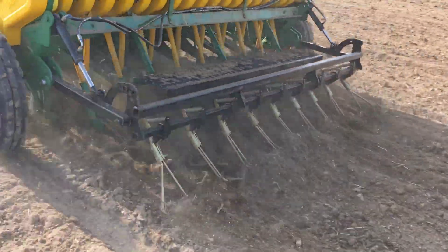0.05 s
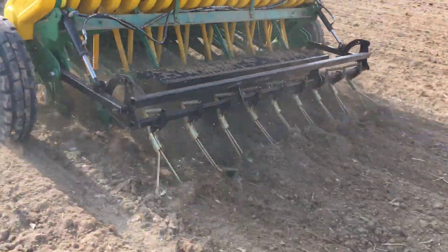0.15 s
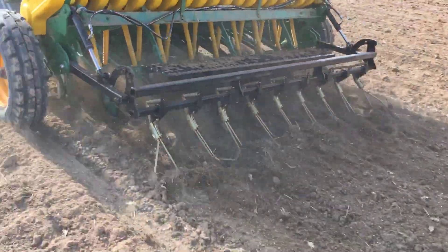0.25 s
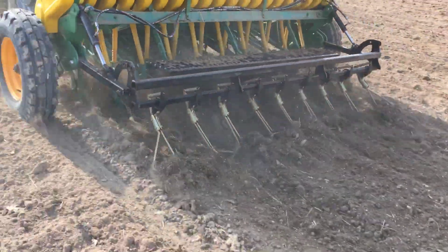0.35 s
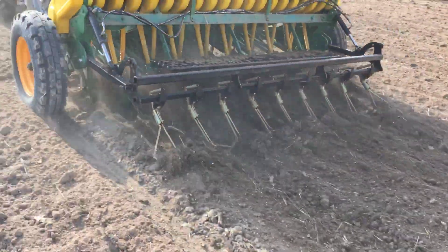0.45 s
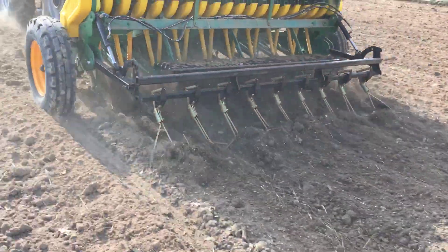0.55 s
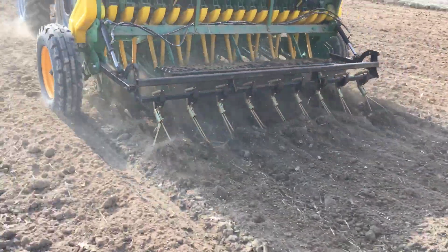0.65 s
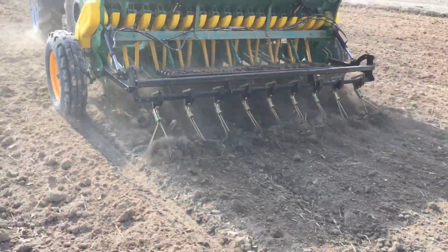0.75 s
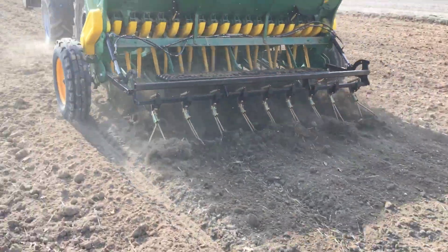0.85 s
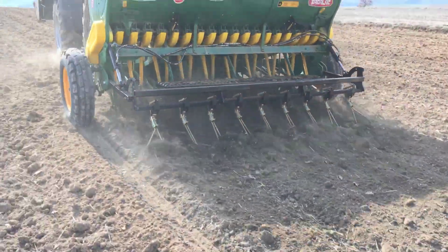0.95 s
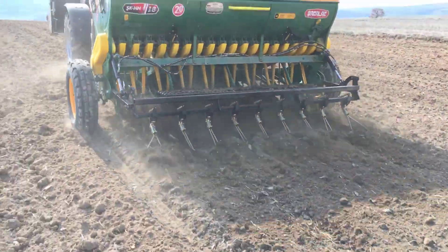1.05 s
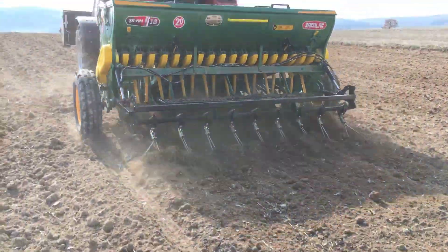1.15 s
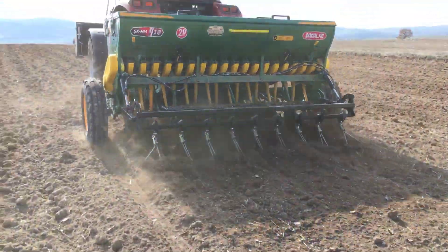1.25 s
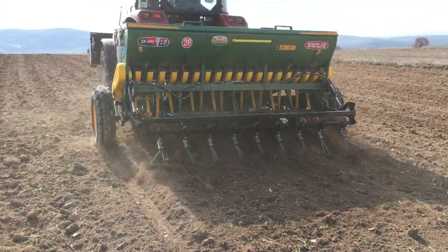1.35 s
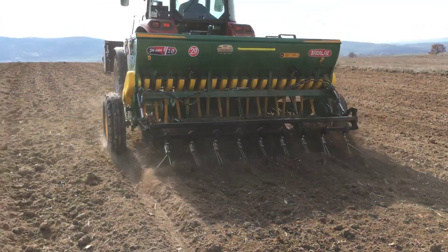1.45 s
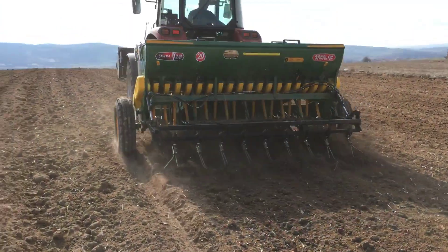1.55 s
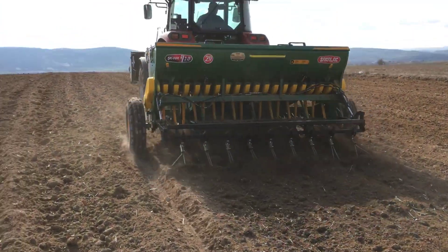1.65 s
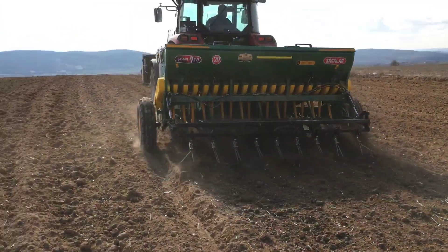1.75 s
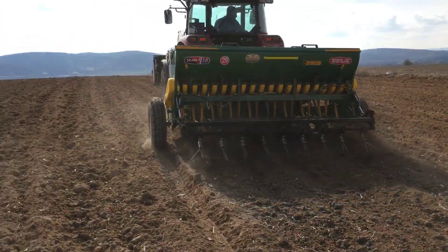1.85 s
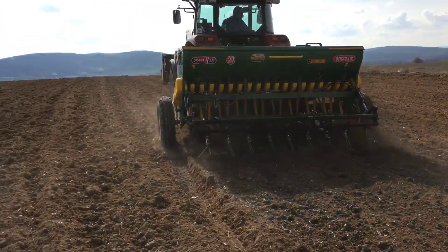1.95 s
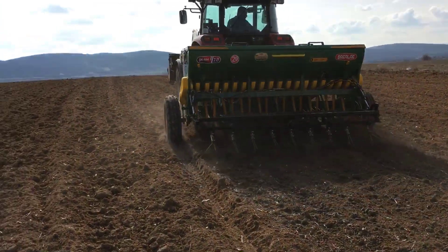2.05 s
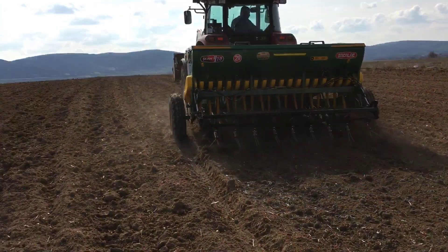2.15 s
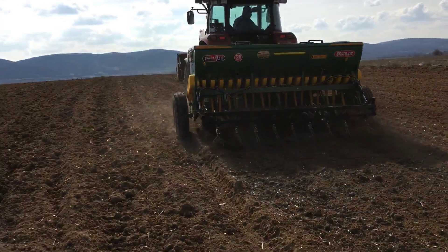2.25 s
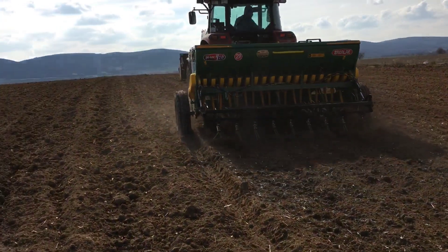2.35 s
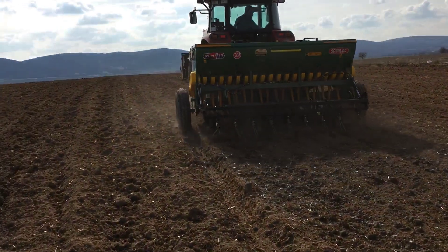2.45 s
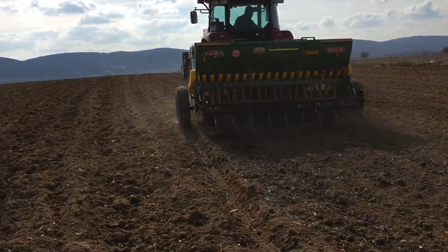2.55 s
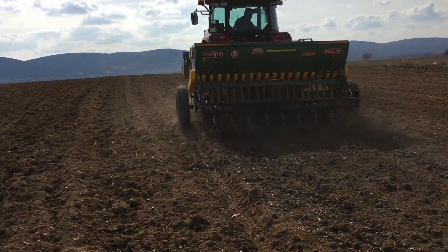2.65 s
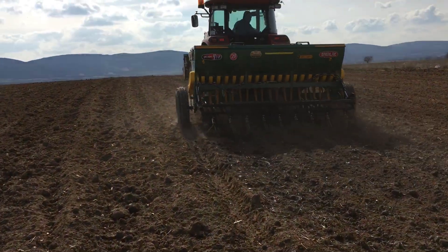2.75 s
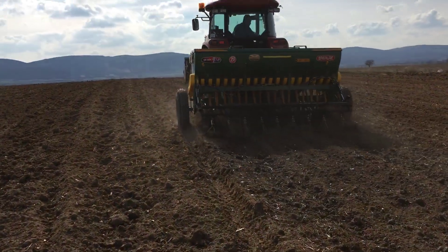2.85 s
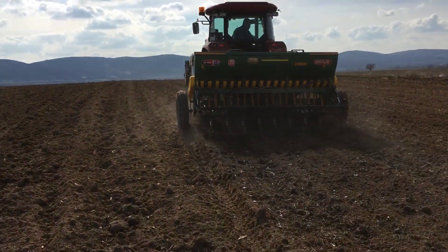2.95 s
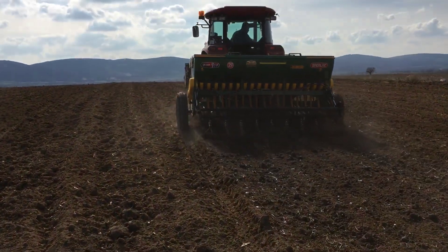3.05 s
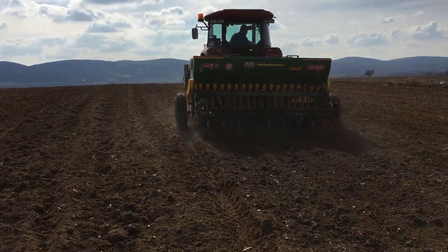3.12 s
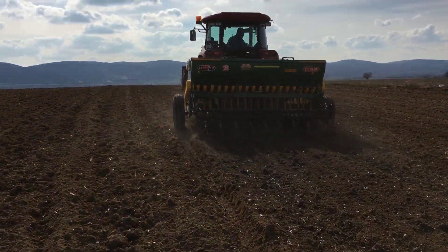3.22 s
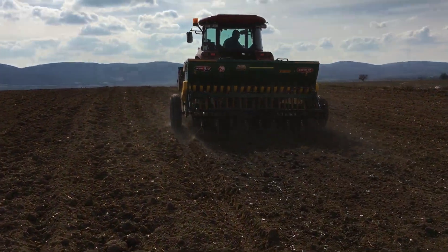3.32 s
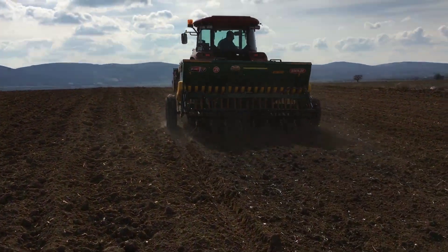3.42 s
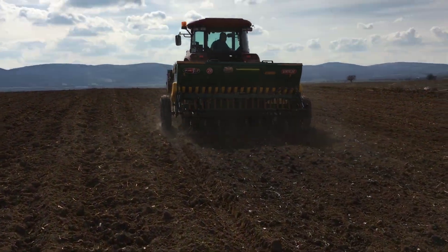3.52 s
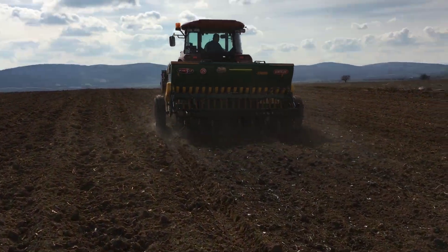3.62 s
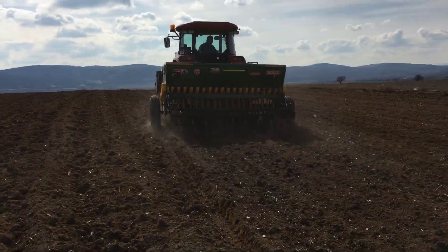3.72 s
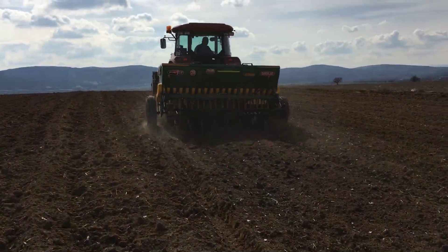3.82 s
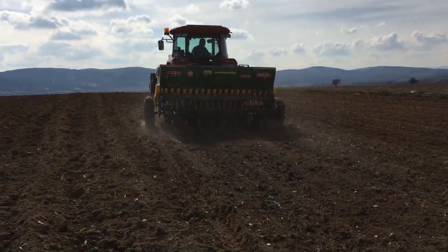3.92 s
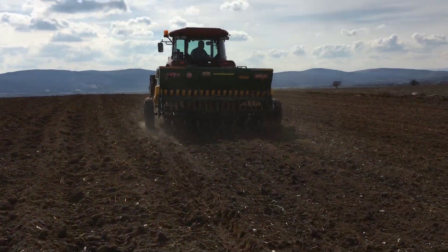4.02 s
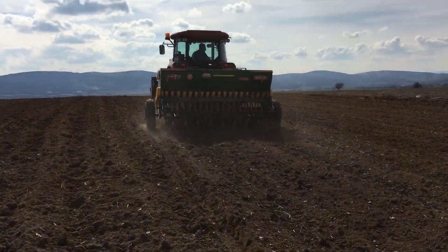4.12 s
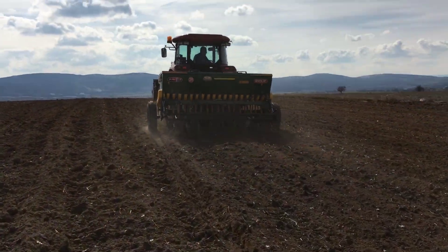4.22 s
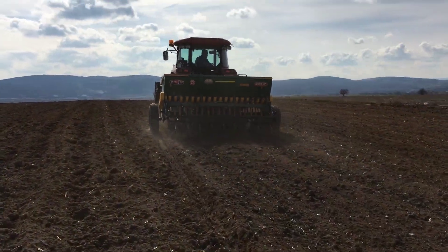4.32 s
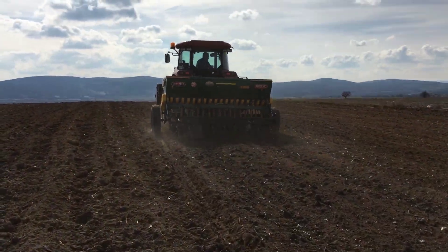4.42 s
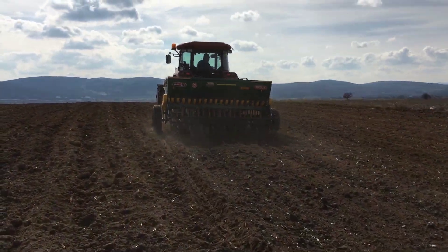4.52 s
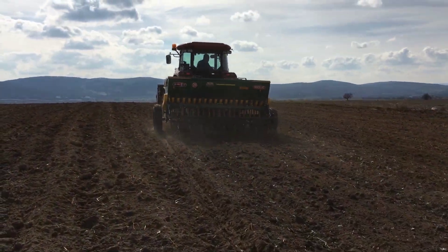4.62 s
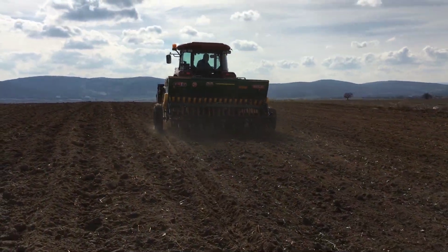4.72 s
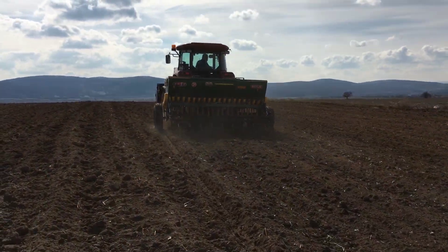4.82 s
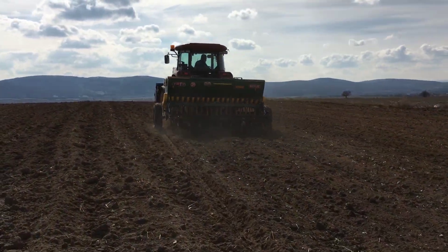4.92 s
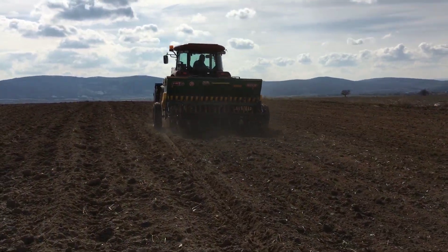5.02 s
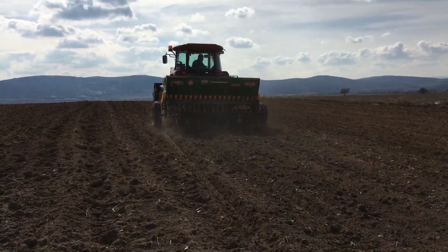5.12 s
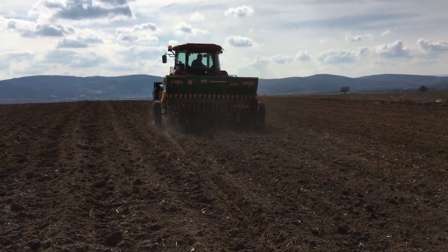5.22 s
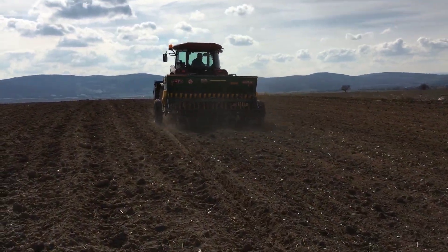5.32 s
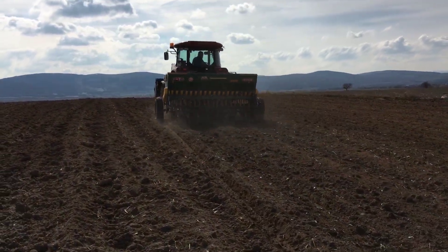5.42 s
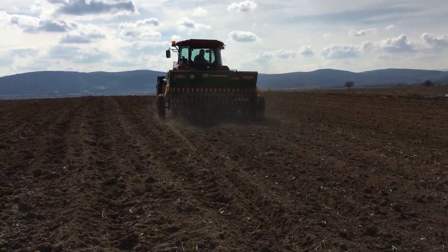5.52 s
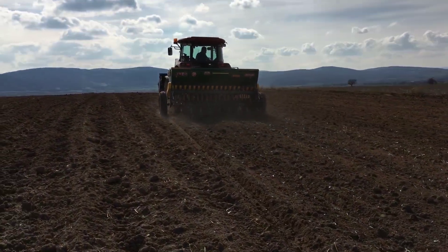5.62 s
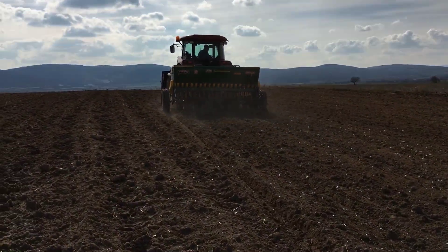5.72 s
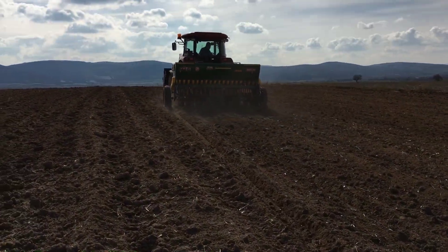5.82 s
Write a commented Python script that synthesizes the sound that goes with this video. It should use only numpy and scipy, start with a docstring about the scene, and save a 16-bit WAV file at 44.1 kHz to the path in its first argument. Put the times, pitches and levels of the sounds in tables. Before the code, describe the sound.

A tractor engine works at steady throttle, close and harsh at first, with rough metallic chatter and whining gears over a low throbbing exhaust. Moving away, it becomes a quieter, duller drone. Faint dry soil hiss from the drill tines fades too, with a tiny stone click. Gusts rumble and pop against the unshielded mono microphone; there is no room echo.

```python
"""A four-cylinder diesel tractor tows a seed drill away across a dry field at steady throttle.
Its exhaust is a stack of low tones; looped and chance knocks, filtered, make the clatter and injector rattle.
Gears whine as blurred tones locked to the crankshaft. Filtered noise and grains are soil hissing past the
tines, with clicks of stones; faint brief tones, mostly high, come and go. Wind noise gusts and sudden pops
strike the microphone, over a faint steady hiss."""
import sys
import numpy as np
from scipy import signal
from scipy.fft import rfft, irfft, next_fast_len
from scipy.io import wavfile
from scipy.ndimage import uniform_filter1d

SR = 44100
rng = np.random.default_rng(int(sys.argv[2]) if len(sys.argv) > 2 else 0)


def to_wav(s):
    """Save 16-bit WAV."""
    ch = np.atleast_2d(s).T  # columns
    pcm = np.round(np.clip(ch, -1, 1) * 32767)  # PCM
    wavfile.write(sys.argv[1], SR, pcm.astype(np.int16))


N = 258867

# Spectra: pitch_hz, level_db (relative density; the coloured sound is scaled to rms 1)
# microphone's own hiss
HISS_SPECTRUM = [(100, -1), (4000, -2), (9500, -1.5), (11000, -4.5), (15500, -8)]
# deep wind rumble, and the flutter above it
RUMBLE_SPECTRUM = [(5, -71.5), (15, -44), (27, -15), (38, 2), (50, 11), (70, 4.5), (100, -1), (140, -5.5),
                   (200, -14.5), (400, -58), (2000, -110)]
FLUTTER_SPECTRUM = [(20, -45.5), (70, -31.5), (130, -2), (200, 2.5), (300, -1.5), (450, -6.5), (700, -20.5),
                    (1400, -19.5), (2800, -37), (6000, -87)]
# soil on the tines, and a stone clicking against one
SOIL_SPECTRUM = [(1000, -43.5), (3500, -10.5), (4900, -2.5), (5500, 2.5), (6100, 0.5), (6600, -1.5),
                 (7200, -7.5), (7550, -7.5), (7900, -9), (9600, -11), (10500, -29), (11500, -13.5),
                 (15500, -30)]
STONE_SPECTRUM = [(1200, -46), (2600, -2), (3100, 6), (3900, 0), (4500, -18), (7000, -47), (12000, -73)]
# injector rattle, and the engine block
INJECTOR_SPECTRUM = [(200, -50), (900, -2), (1400, -0.5), (1650, 3.5), (2020, -4), (2300, 2.5),
                     (2750, -2.5), (3200, -3), (3500, -11.5), (4000, -19), (4400, -22.5), (4800, -28.5),
                     (7000, -57), (14000, -68)]
BLOCK_SPECTRUM = [(120, -20), (200, -18.5), (400, -9), (490, -7), (570, -1), (620, 1), (690, 3),
                  (750, -0.5), (920, -0.5), (1020, -5), (1170, -17), (1300, -27.5), (1600, -26),
                  (1900, -44.5), (5000, -100)]

# breeze between the gusts: time_s, rumble_db, flutter_db (before the wind trims)
BREEZE = [(0, -36, -31.5), (1.3, -40, -37.5), (2.4, -39, -38.5), (3.6, -41.5, -42), (4.7, -44, -58.5),
          (5.2, -46.5, -59), (5.87, -42, -44)]
# gusts: height_s, length_s, rumble_db, flutter_db (before the wind trims)
GUSTS = [(-0.006, 0.08, -30.5, -23.5), (0.134, 0.12, -32, -32), (0.265, 0.074, -36, -32),
         (0.454, 0.026, -32, -34), (0.478, 0.064, -39, -45), (0.652, 0.05, -29, -31.5),
         (0.703, 0.019, -42, -25.5), (0.754, 0.02, -35, -30), (0.808, .05, -34, -31),
         (1.08, 0.049, -35, -31.5), (1.883, 0.03, -32.5, -42), (2.11, 0.25, -35, -37.5),
         (2.274, 0.041, -32.5, -34), (3.037, 0.019, -50, -35), (3.234, 0.03, -35, -35),
         (3.332, 0.087, -31.5, -32.5), (3.595, 0.1, -30.5, -35.5), (3.716, 0.043, -31.5, -61),
         (3.87, 0.1, -35, -39), (4.352, 0.065, -38, -40), (4.875, 0.055, -36.5, -47),
         (5.339, 0.043, -32.5, -34.5), (5.57, 0.21, -35.5, -39.5), (5.823, 0.099, -39, -38)]
# eddies bursting on the microphone: start_s, strength_db (before decay and filters), sharpness_hz
POPS = [(.024, -11.5, 77), (0.029, -18.5, 180), (.105, -15, 93), (0.123, -15.5, 116), (.226, -17, 75),
        (0.2668, -20, 93), (0.445, -17, 700), (.448, -22, 1100), (0.49, -15, 93), (.650, -21.5, 1350),
        (0.653, -20, 75), (0.6598, -11.5, 65), (.679, -24, 1400), (0.701, -23, 1020), (.71, -17, 1220),
        (0.715, -18.5, 180), (.759, -13.5, 750), (0.78, -18, 199), (.801, -14.5, 273), (1.080, -20.5, 1490),
        (1.082, -21, 346), (1.099, -21.5, 1290), (1.104, -26, 1500), (2.032, -16.5, 93), (2.136, -23, 404),
        (2.1505, -12.5, 116), (2.283, -18.5, 304), (2.29, -17, 98), (2.375, -16, 480), (3.025, -23.5, 450),
        (3.319, -19, 70), (3.329, -23, 500), (3.347, -15, 56), (3.595, -9.5, 54), (3.61, -17, 70),
        (3.724, -16.5, 54), (3.8043, -11.5, 444), (3.834, -20.5, 260), (3.864, -24, 109), (3.881, -19, 100),
        (5.33, -24.5, 380), (5.338, -18, 60), (5.52, -20, 130)]

# patches of clods under the tines: start_s, length_s, level_db
CLOD_PATCHES = [(0.4, 0.36, -70), (1.04, 0.57, -79.5), (1.787, 0.18, -73), (2.33, 0.2, -73),
                (3.743, 0.22, -78)]
# stones glancing off a tine: start_s, peak_db
STONES = [(.88, -44), (5.613, -53)]
# faint brief tones, mostly high: height_s, length_s, pitch_hz, level_db
BRIEF_TONES = [(0.012, 0.13, 1986, -47.5), (0.526, 0.22, 7500, -77), (1.125, 0.11, 7550, -78.5),
               (1.81, .12, 7430, -85), (3.06, 0.31, 1613, -55), (3.308, 0.16, 6410, -84),
               (3.464, 0.065, 6420, -87), (4.15, .06, 5600, -80), (5.033, .07, 5800, -81),
               (5.108, .06, 5620, -81), (5.38, .15, 5720, -84)]

# gear meshes: crank_multiple (times crankshaft speed), blur_rad (rms wander of the phase)
GEAR_MESHES = [(21.14, .7), (22.4, 1.6), (23, .9), (25, .6), (25.75, .9), (26.5, 1.2), (27, .6),
               (27.55, 1.1), (28.02, .4), (31.3, 1.3), (32.3, 1.0), (33.6, .9), (34.15, 1.6), (36.2, .8),
               (39.6, 1.8), (42.3, .85), (63.4, 2.6), (171, 5)]
# rise and fall of each whine: height_db, height_s, spread_s
GEAR_SWELLS = [(-48.5, 4.2, 1.96), (-50, 3.58, 1.1), (-49, 1.6, 2.2), (-45, 0.98, .35), (-50, 4.56, 1.1),
               (-51, 1.95, 1.2), (-46.5, 4.75, .5), (-43, 0.86, .7), (-48.5, 3.63, 2.47), (-43, 1.37, 1.3),
               (-43, 1, 0.72), (-41, 0.67, 0.58), (-57.5, 3.8, 1.1), (-43, 0.48, 0.87), (-50, 2.43, 1.13),
               (-53, 2.34, 3.9), (-62, 6.2, 3.5), (-71, 0.4, 0.37)]

# injector rattle: time_s, level_db (before its trim and the ring)
RATTLE_LEVEL = [(0, -45), (0.3, -45), (0.65, -43.5), (0.95, -49), (1.25, -47.5), (1.6, -50.5), (1.9, -45.5),
                (2.2, -51.5), (3.65, -52), (3.9, -49.5), (4.35, -54), (5.1, -55.5), (5.4, -54),
                (5.87, -54.5)]
# rattle bands that swell or sink for a while: pitch_hz, width_hz, height_db, extra_db, extra_s, spread_s
RATTLE_BANDS = [(1410, 89, -1, 11.5, 0.1, 0.66), (1680, 190, 0.5, -14.5, 0.1, 0.32),
                (2000, 150, -1, 10.5, 0.14, 0.85), (2560, 180, -3, 8, 0.26, 0.51),
                (2640, 140, -0.5, -5, 5.4, .5), (3530, 550, 4, -5, 0.48, 0.73),
                (4450, 410, 1.5, 7.5, 1.2, 0.57), (1106, 120, -0.5, 13, 1.85, 0.37),
                (1050, 72, 3, 17, .66, 0.1), (1064, 73, -0.5, 16, 3.6, .2), (1027, 81, -1, 15, .05, .22),
                (1380, 150, 0, 10, 5.8, .2)]
# the rattle's brightest ring, flaring and sinking: time_s, pitch_hz, height_db
RATTLE_RING = [(0, 2380, 7), (.25, 2400, -5), (.85, 2430, 7), (1.1, 2390, 11.5), (1.32, 2420, 7),
               (1.45, 2340, 9.5), (1.8, 2420, 4), (2.05, 2400, 0), (2.2, 2470, 3.5), (2.42, 2380, 7),
               (2.75, 2330, 4), (3.1, 2320, -1), (3.35, 2360, 2.5), (3.7, 2350, 2.5), (3.86, 2280, 9.5),
               (4.05, 2360, 0.5), (4.27, 2410, 7), (4.5, 2370, 2.5), (5.05, 2420, -0.5), (5.35, 2450, 7.5),
               (5.87, 2410, 4)]

# combustion clatter: time_s, level_db (before its trim)
CLATTER_LEVEL = [(0, -27.5), (0.22, -34), (0.48, -32), (1.05, -33), (1.6, -34.5), (2.1, -33.5), (3.0, -39),
                 (3.4, -36), (4.4, -38), (5.4, -43), (5.87, -37)]
# hollow band in the clatter, sliding mostly down: time_s, pitch_hz, height_db
HOLLOW_BAND = [(0, 1210, -16), (.5, 1144, -11), (.9, 1007, -7), (1.35, 982, -15.5), (2.0, 926, -13.5),
               (2.6, 880, -9.5), (3.3, 865, -6.5), (3.9, 884, -12.5), (5.0, 850, -18.5), (5.87, 876, -6)]

# exhaust tones as multiples of crankshaft speed: crank_multiple
EXHAUST_ORDERS = [2, 3, 4, 6, 7, 8, 10, 12, 14]
# balance of those tones: level_db (relative)
EXHAUST_BALANCE = [-12.5, -13, 0.5, -10, -23, -27.5, -27.5, -26, -23.5]
# exhaust drone: time_s, level_db (before its trim)
DRONE_LEVEL = [(0, -30), (.8, -32.5), (1.0, -33), (1.3, -33), (2.1, -33.5), (2.35, -33), (2.65, -33),
               (3.0, -34), (3.8, -35.5), (4.3, -35), (5.3, -37.5), (5.87, -39)]
# crankshaft speed, hunting a little under the load: time_s, speed_turns_per_s
CRANK_SPEED = [(0, 24.55), (.2, 24.48), (.5, 24.72), (.73, 24.45), (1.0, 25.05), (1.22, 25.13),
               (1.45, 25.62), (1.7, 25.35), (1.88, 25.4), (2.1, 25.62), (2.38, 25.42), (2.6, 25.62),
               (2.78, 25.85), (3.07, 25.42), (3.3, 25.98), (3.58, 25.58), (3.85, 25.95), (4.08, 25.97),
               (4.28, 25.8), (4.5, 26.18), (4.73, 25.9), (4.97, 26.28), (5.25, 25.83), (5.5, 26.03),
               (5.87, 25.88)]

# the drill is drawn straight away from the microphone
START_M, DRIVE_M_PER_S = 4, 1.96
# tine hiss: level at the start, and loss for each doubling of distance
DRAG_DB, DRAG_LOSS_DB = -69, 6.5
CLOD_ATTACK_S, CLOD_RELEASE_S = .04, .065
# the soil's reflection: first lag, growth of the lag in s per s, gain of the copy
ECHO_LAG_S, ECHO_GROWTH, ECHO_GAIN = .00129, .0002, .35
# the hood's resonance sinks and flattens as the tractor draws off, halfway at HOOD_FADE_S
HOOD_NEAR_HZ, HOOD_FAR_HZ, HOOD_NEAR_DB, HOOD_FAR_DB = 864, 700, 5, -3
HOOD_FADE_S, HOOD_FADE_POWER = 2.17, 4.1
# lifted bands just below and just above the hollow one: frequency ratios and heights
EDGE_RATIO, EDGE_DB = .89, 4.5
CREST_RATIO, CREST_NEAR_DB = 1.192, 15
# glide of a rattle band around its swell, as a share of its pitch per second
BAND_SLIDE_PER_S = .12
# knock-to-knock scatter, and pulsing of the whine as firings load the teeth
KNOCK_SCATTER_DB, FIRING_PULSE_DB = 1.24, .5


def from_db(db):
    """Turn decibels into gain."""
    return 10 ** (np.asarray(db) / 20)


def rms_one(x):
    """Scale to unit rms."""
    return x / np.sqrt(np.mean(x ** 2) + 1e-20)


def seconds():
    """The time of each sample."""
    return np.arange(N) / SR


def in_time(rows):
    """Draw each column of a curve sample by sample."""
    s, *columns = np.transpose(rows)
    return [np.interp(seconds(), s, column) for column in columns]


def noise():
    """White noise for the whole scene."""
    return rng.standard_normal(N)


def swell(at_s, spread_s):
    """A bell-shaped rise and fall of height 1."""
    return np.exp(-np.minimum(((seconds() - at_s) / spread_s) ** 2, 20))


def drift(rate_hz):
    """Random wander of rms 1: noise through two equal low-pass poles, run at a fortieth of SR."""
    pole = np.exp(-80 * np.pi * rate_hz / SR)
    raw = rng.standard_normal(N // 40 + 2002)
    slow = signal.lfilter([1], [1, -2 * pole, pole * pole], raw)[2000:]  # drop the run-in
    return np.interp(np.arange(N) / 40, np.arange(len(slow)), rms_one(slow))


def coloured(x, spectrum):
    """Give a sound a spectrum, at rms 1."""
    hz, db = np.transpose(spectrum)
    size = next_fast_len(N)
    bins = np.maximum(np.fft.rfftfreq(size, 1 / SR), 1)
    gain = from_db(np.interp(np.log(bins), np.log(hz), db))
    return rms_one(irfft(rfft(x, size) * gain, size)[:N])


def steady(x, size):
    """Even out the level over a span of samples."""
    return x / np.sqrt(uniform_filter1d(x ** 2, size) + 1e-12)


def moving_peak(x, hz, db, width_hz, size=512):
    """A resonance, or a notch, whose centre and height move block by block."""
    hz, db = np.broadcast_to(hz, N), np.broadcast_to(db, N)
    out, state, half = np.zeros(N), np.zeros(2), np.pi * width_hz / SR
    for i in range(0, N, size):
        g = from_db(db[i] / 2)
        c = -2 * np.cos(2 * np.pi * hz[i] / SR)
        top, bottom = [1 + half * g, c, 1 - half * g], [1 + half / g, c, 1 - half / g]
        out[i:i + size], state = signal.lfilter(top, bottom, x[i:i + size], zi=state)
    return out


def receding(start_db, loss_db):
    """Gain of a source that loses so much with each doubling of its distance."""
    return from_db(start_db - loss_db * np.log2(1 + DRIVE_M_PER_S * seconds() / START_M))


def reflected(x):
    """Add an inverted copy that lags more and more, so a comb of bands slides downwards."""
    t = seconds()
    return rms_one(x - ECHO_GAIN * np.interp(t - ECHO_LAG_S - ECHO_GROWTH * t, t, x))


def knocks(turns, repeat, depth_db, uneven_db, slack_turns, size=4096):
    """Contacts recurring every two turns, loosened by slack and mixed with chance ones; firings lift them."""
    cycle = rng.standard_normal(size)
    place = (turns + slack_turns * drift(5)) / 2 % 1 * size
    recurring = rms_one(np.interp(place, np.arange(size), cycle))
    contacts = np.sqrt(repeat) * recurring + np.sqrt(1 - repeat) * noise()
    firing_db = depth_db * np.cos(4 * np.pi * turns)  # four peaks in two turns
    turn_db = uneven_db * np.cos(2 * np.pi * turns)
    return contacts * from_db(firing_db + turn_db + KNOCK_SCATTER_DB * drift(55))


def microphone_hiss(level_db):
    """The microphone's own noise, steady and faint."""
    return from_db(level_db) * coloured(noise(), HISS_SPECTRUM)


def wind(rumble_trim_db, flutter_trim_db, lumpy_db):
    """Gusts rise out of the breeze with a deep rumble and a lumpy flutter above it."""
    rumble_power, flutter_power = from_db(in_time(BREEZE)) ** 2
    for s, length_s, rumble_db, flutter_db in GUSTS:
        gust = swell(s, length_s / 2)
        rumble_power = rumble_power + from_db(rumble_db) ** 2 * gust
        flutter_power = flutter_power + from_db(flutter_db) ** 2 * gust
    rumble = steady(coloured(noise(), RUMBLE_SPECTRUM), size=3000)
    lumps = noise() * from_db(lumpy_db * drift(58))
    flutter = steady(coloured(lumps, FLUTTER_SPECTRUM), size=3000)
    deep = from_db(rumble_trim_db) * np.sqrt(rumble_power) * rumble
    return deep + from_db(flutter_trim_db) * np.sqrt(flutter_power) * flutter


def pops(decay_s, low_cut_hz, top_hz, size=4096):
    """An eddy bursts with a sudden suction, then swings back and forth, each swing twice as long."""
    out, t = np.zeros(N + size), np.arange(size) / SR
    for s, db, sharpness_hz in POPS:
        at = round(s * SR)
        swings = np.sin(np.pi * np.log2(1 + 2 * sharpness_hz * t))
        decay = np.exp(-t / (decay_s + .5 / sharpness_hz))  # blunter pops last longer
        out[at:at + size] -= from_db(db) * swings * decay
    low_cut = signal.butter(1, low_cut_hz, "high", fs=SR, output="sos")
    top_cut = signal.butter(4, top_hz, fs=SR, output="sos")
    return signal.sosfilt(np.vstack([low_cut, top_cut]), out[:N])


def brief_tones(blur_rad, rough_db):
    """Short, unsteady tones swell and fade."""
    t, wobble = seconds(), blur_rad * drift(30)
    tones = np.zeros(N)
    for s, length_s, hz, db in BRIEF_TONES:
        tones += from_db(db) * swell(s, length_s / 2) * np.sin(2 * np.pi * hz * t + wobble)
    return np.sqrt(2) * tones * from_db(rough_db * drift(40))


def soil(grains_per_s, grain_db, flicker_db):
    """Crumbs slide past the tines in a soft hiss with a few harder ticks; it swells in patches of clods."""
    t, power = seconds(), receding(DRAG_DB, DRAG_LOSS_DB) ** 2
    for s, length_s, db in CLOD_PATCHES:
        end_s = s + length_s
        corners_s = [s - CLOD_ATTACK_S, s, end_s, end_s + CLOD_RELEASE_S]
        envelope = np.interp(t, corners_s, [0, 1, 1, 0])
        power = power + (from_db(db) * envelope) ** 2
    grains = (rng.random(N) < grains_per_s / SR) * noise()
    crumbs = noise() + from_db(grain_db) * rms_one(grains)
    level = np.sqrt(power) * from_db(flicker_db * drift(15))
    return level * reflected(coloured(crumbs, SOIL_SPECTRUM))


def stones(decay_s, size=2048):
    """A stone glances off a tine: a decaying noise burst, filtered to a short, bright click."""
    out = np.zeros(N)
    for s, db in STONES:
        scratch = np.zeros(N)
        at = round(s * SR)
        scratch[at:at + size] = rng.standard_normal(size) * np.exp(-np.arange(size) / (decay_s * SR))
        click = coloured(scratch, STONE_SPECTRUM)
        out += from_db(db) * click / np.abs(click).max()
    return out


def gears(turns, waver_db, rough_db):
    """Meshing teeth whine and growl; backlash blurs and roughens the tones."""
    out = np.zeros(N)
    pulse_db = FIRING_PULSE_DB * np.cos(4 * np.pi * turns)
    for (multiple, blur_rad), (db, at_s, spread_s) in zip(GEAR_MESHES, GEAR_SWELLS):
        phase = 2 * np.pi * multiple * turns + blur_rad * drift(8.4)
        level_db = db + waver_db * drift(4.1) + rough_db * drift(61) + pulse_db
        out += from_db(level_db) * swell(at_s, spread_s) * np.sin(phase)
    return np.sqrt(2) * out


def injectors(turns, trim_db):
    """The bright diesel rattle, knocks ringing in the pump housing and thin covers."""
    contacts = knocks(turns, repeat=.15, depth_db=.37, uneven_db=-1.44, slack_turns=.0036)
    rattle = coloured(contacts, INJECTOR_SPECTRUM)
    for hz, width_hz, db, extra_db, extra_s, spread_s in RATTLE_BANDS:
        extra = swell(extra_s, spread_s)
        slide = 1 - BAND_SLIDE_PER_S * (seconds() - extra_s) * extra
        rattle = moving_peak(rattle, hz * slide, db + extra_db * extra, width_hz)
    ring_hz, ring_db = in_time(RATTLE_RING)
    ringing = moving_peak(steady(rattle, size=8000), ring_hz, ring_db, width_hz=240)
    return from_db(in_time(RATTLE_LEVEL)[0] + trim_db) * ringing


def clatter(turns, trim_db):
    """Combustion shakes block and hood; a hollow band slides mostly down, with a lifted band either side."""
    contacts = knocks(turns, repeat=.39, depth_db=1.9, uneven_db=-.5, slack_turns=.0088)
    block = coloured(contacts, BLOCK_SPECTRUM)
    near = 1 / (1 + (seconds() / HOOD_FADE_S) ** HOOD_FADE_POWER)  # 1 close by, falling towards 0
    hood_hz = HOOD_FAR_HZ + near * (HOOD_NEAR_HZ - HOOD_FAR_HZ)
    hood_db = HOOD_FAR_DB + near * (HOOD_NEAR_DB - HOOD_FAR_DB)
    hood = moving_peak(block, hood_hz, hood_db, width_hz=110)
    hollow_hz, hollow_db = in_time(HOLLOW_BAND)
    edged = moving_peak(hood, EDGE_RATIO * hollow_hz, EDGE_DB, width_hz=180)
    hollowed = moving_peak(edged, hollow_hz, hollow_db, width_hz=190)
    crested = moving_peak(hollowed, CREST_RATIO * hollow_hz, CREST_NEAR_DB * near, width_hz=140)
    return from_db(in_time(CLATTER_LEVEL)[0] + trim_db) * steady(crested, size=8000)


def exhaust(turns, trim_db, waver_db, throb_db):
    """Low tones locked to the crankshaft, strongest at twice the firing rate, throbbing irregularly."""
    tones = np.zeros(N)
    for multiple, db in zip(EXHAUST_ORDERS, EXHAUST_BALANCE):
        phase = 2 * np.pi * (multiple * turns + rng.random())
        tones += from_db(db + waver_db * drift(1.7)) * np.sin(phase)
    level_db = in_time(DRONE_LEVEL)[0] + trim_db + throb_db * drift(14)
    return np.sqrt(2) * from_db(level_db) * tones


def scene():
    """Wind, brief tones, drill and tractor, in mono."""
    air = microphone_hiss(level_db=-78.5)
    air = air + wind(rumble_trim_db=3.5, flutter_trim_db=-3.5, lumpy_db=2.0)
    air = air + pops(decay_s=.0065, low_cut_hz=27.3, top_hz=2400)
    tones = brief_tones(blur_rad=.72, rough_db=1.0)
    drill = soil(grains_per_s=420, grain_db=-4.0, flicker_db=2.0) + stones(decay_s=.0063)
    turns = np.cumsum(in_time(CRANK_SPEED)[0]) / SR
    tractor = gears(turns, waver_db=3.0, rough_db=2.5) + injectors(turns, trim_db=-1.0)
    tractor = tractor + clatter(turns, trim_db=-2.0)
    tractor = tractor + exhaust(turns, trim_db=-.25, waver_db=1.67, throb_db=1.9)
    return (air + tones + drill + tractor)[None]


def record(dry):
    """Roll off the deepest bass and cut the top steeply."""
    thinned = signal.sosfilt(signal.butter(3, 28, "high", fs=SR, output="sos"), dry)
    top_cut = signal.ellip(10, .1, 80, 15700, fs=SR, output="sos")  # ripple dB, stop-band dB, edge Hz
    return signal.sosfilt(top_cut, thinned)


dry = scene()
out = record(dry)
to_wav(out)
```